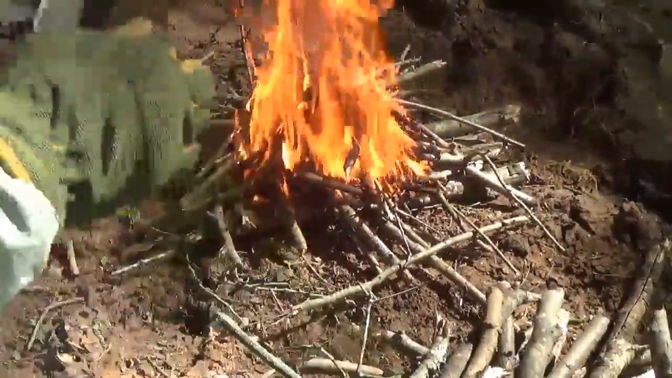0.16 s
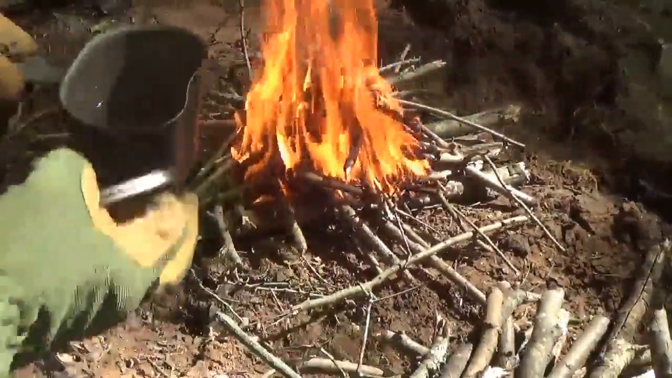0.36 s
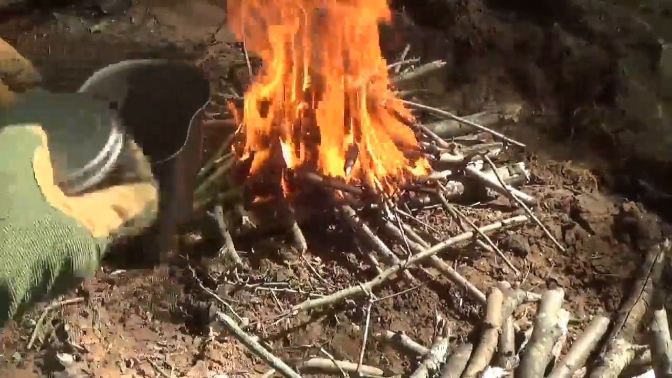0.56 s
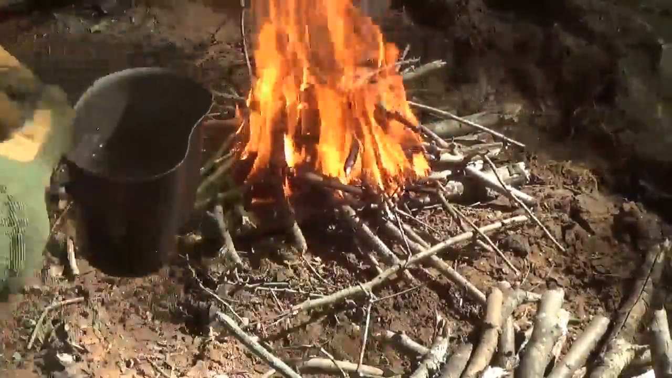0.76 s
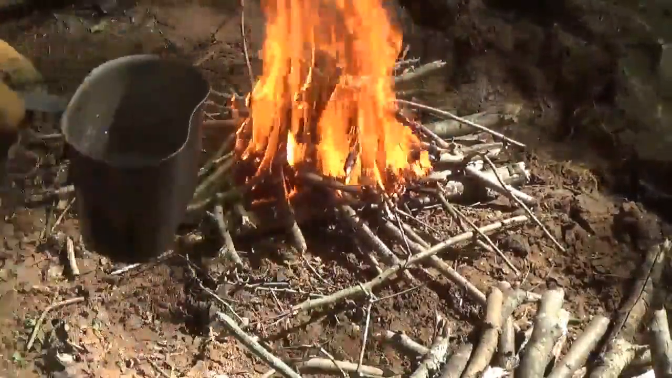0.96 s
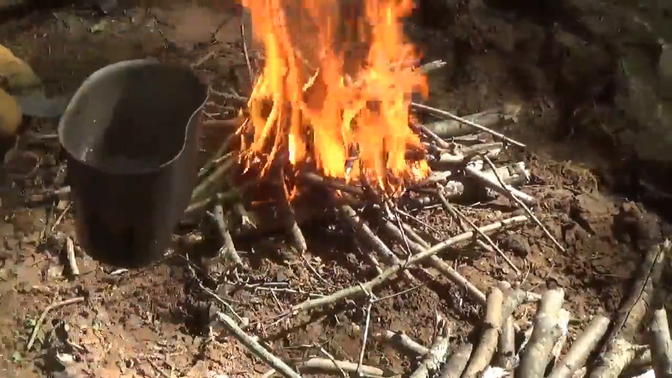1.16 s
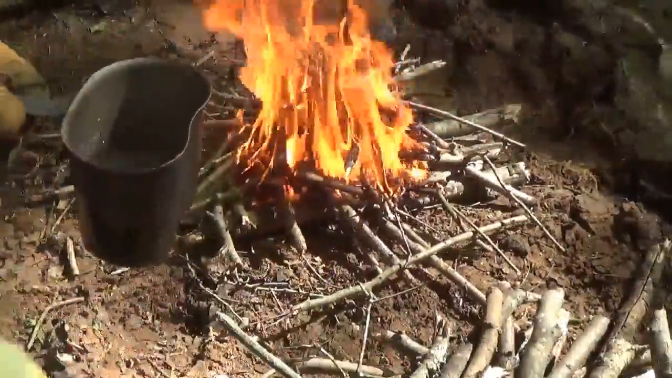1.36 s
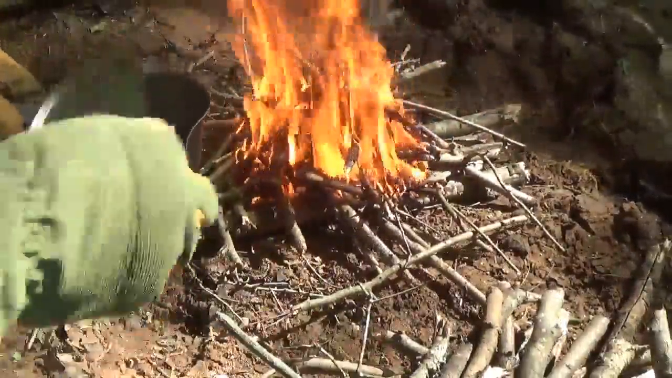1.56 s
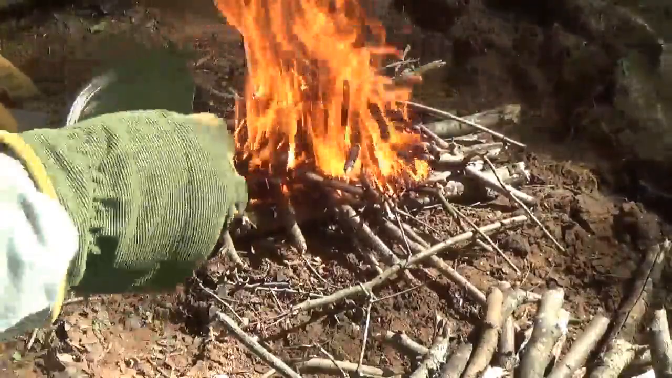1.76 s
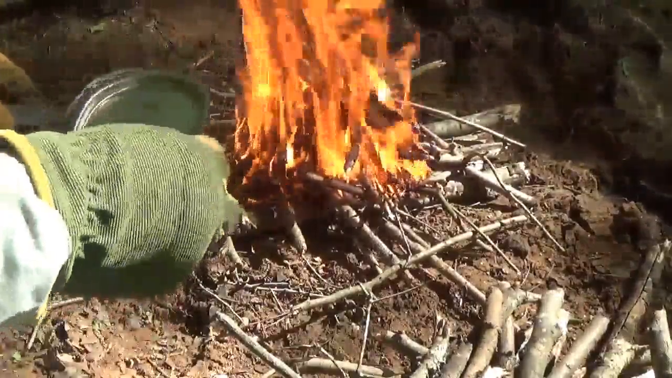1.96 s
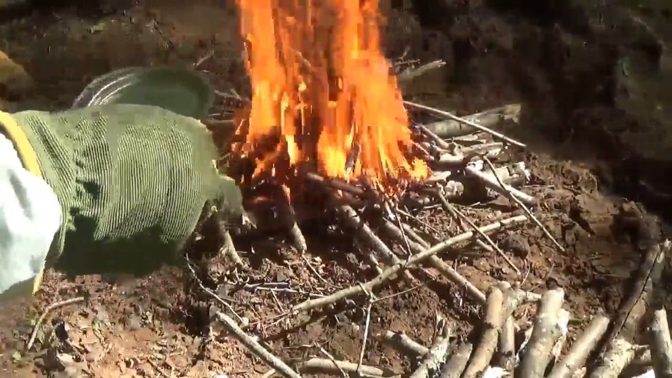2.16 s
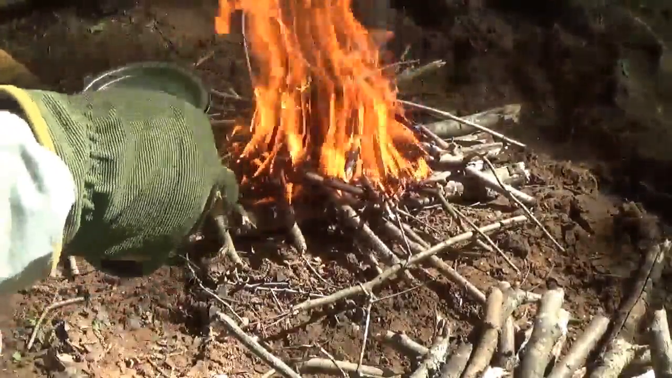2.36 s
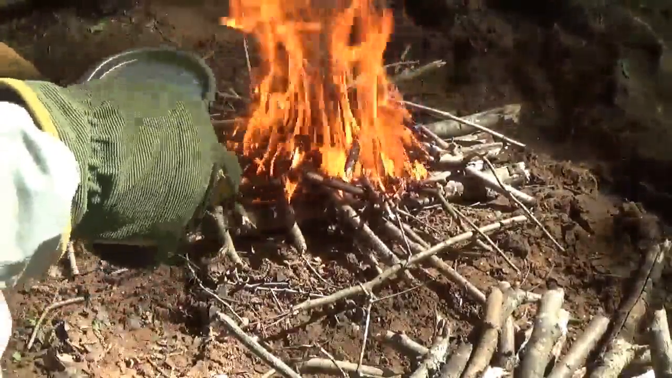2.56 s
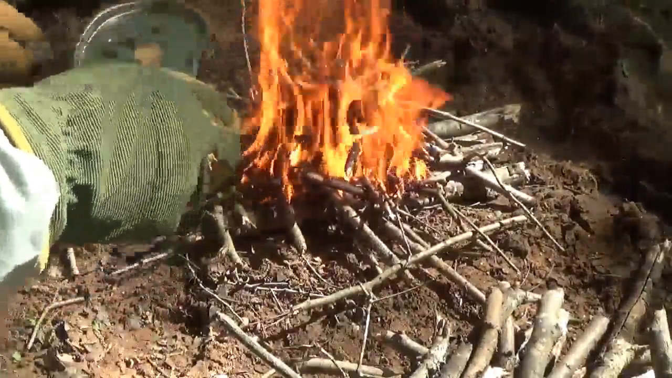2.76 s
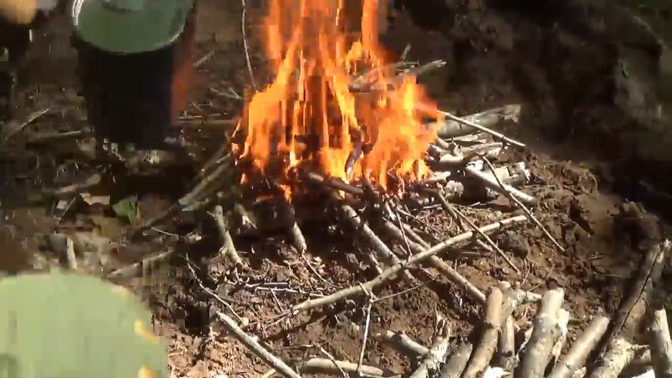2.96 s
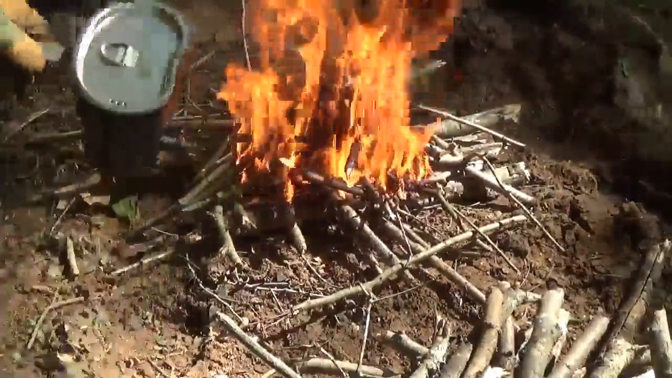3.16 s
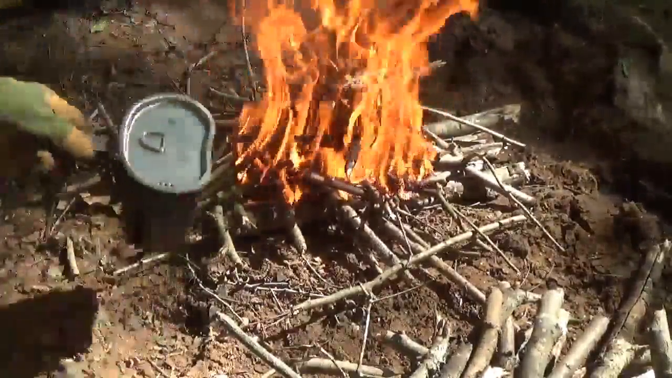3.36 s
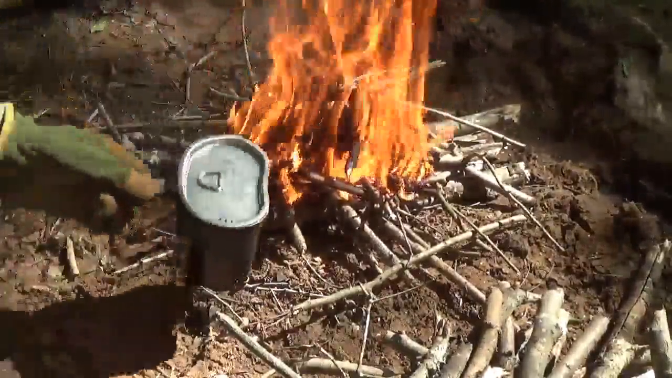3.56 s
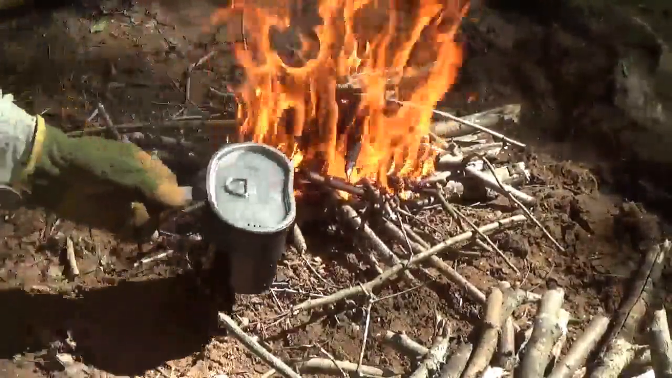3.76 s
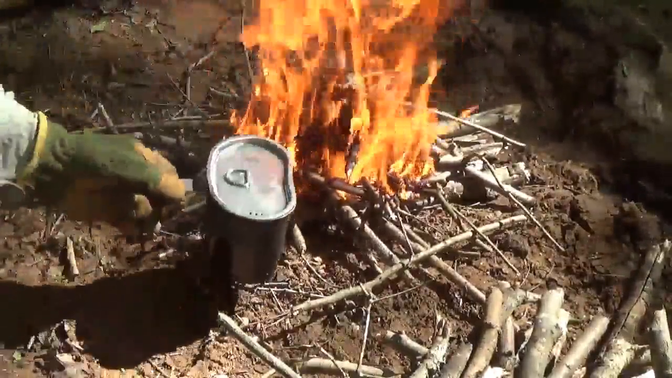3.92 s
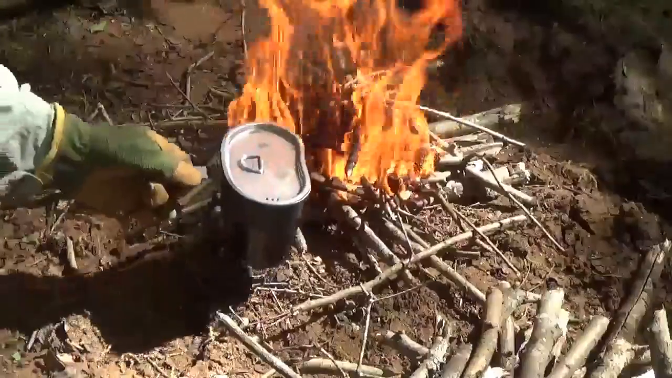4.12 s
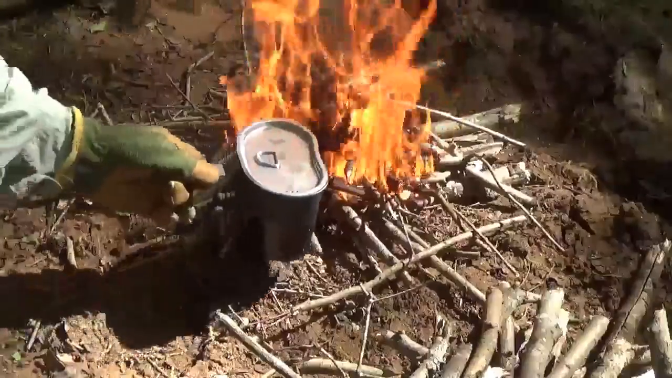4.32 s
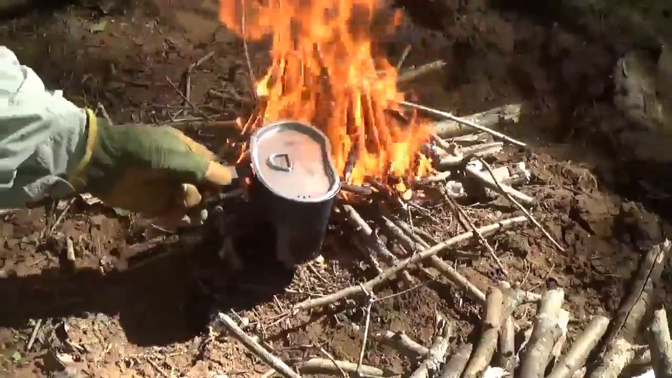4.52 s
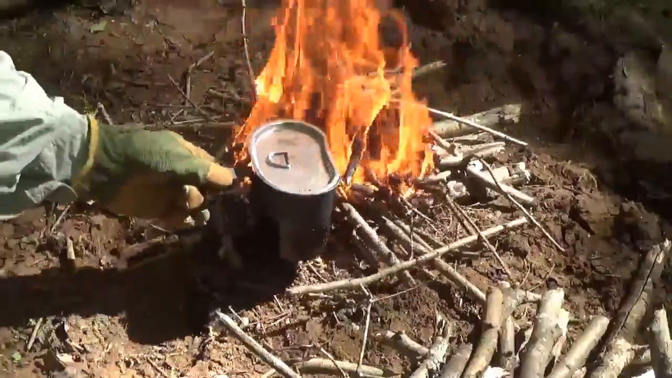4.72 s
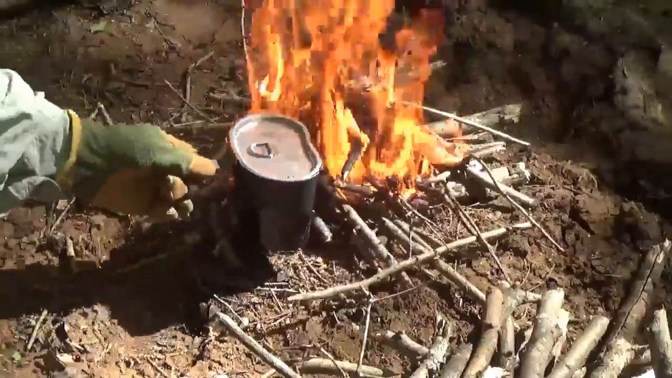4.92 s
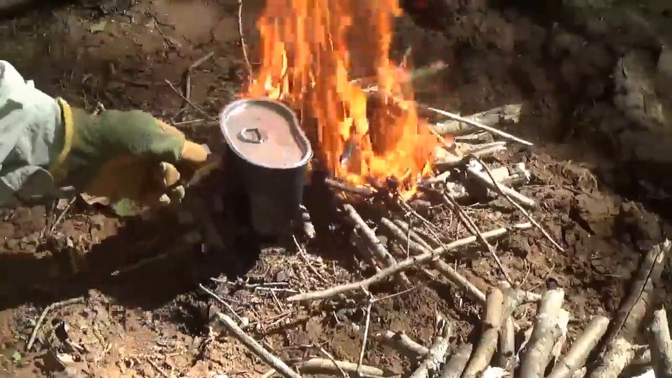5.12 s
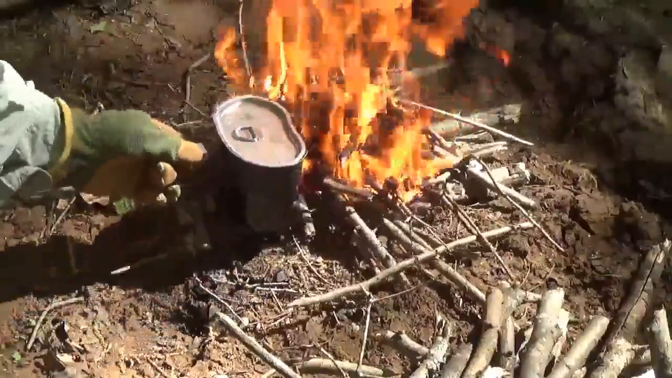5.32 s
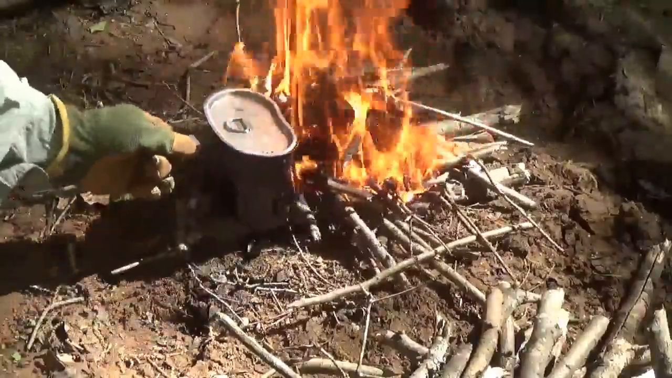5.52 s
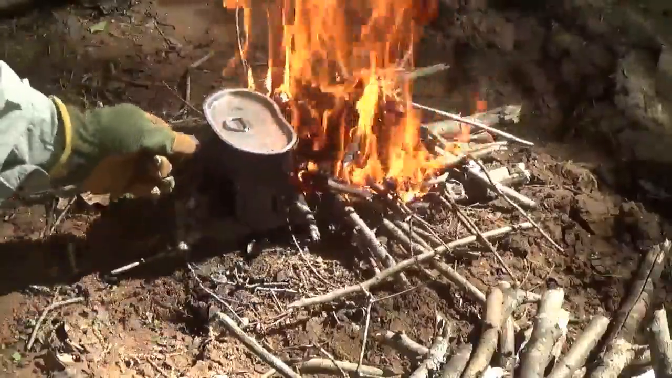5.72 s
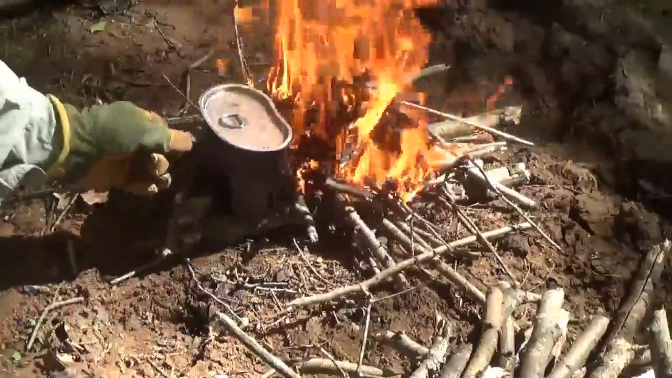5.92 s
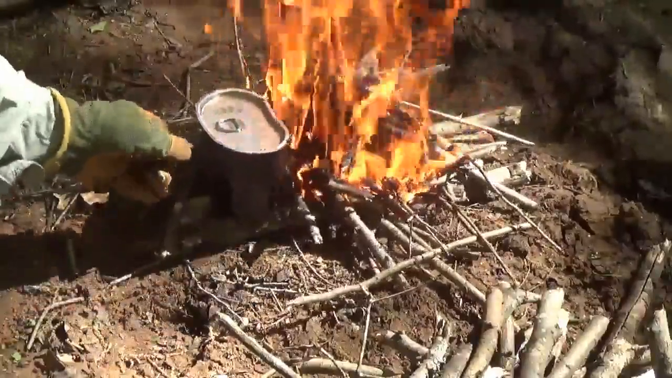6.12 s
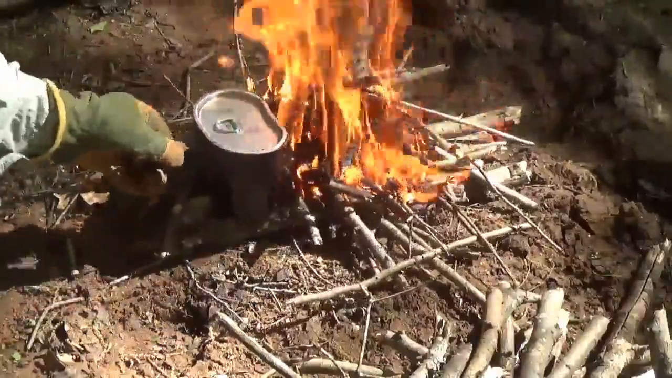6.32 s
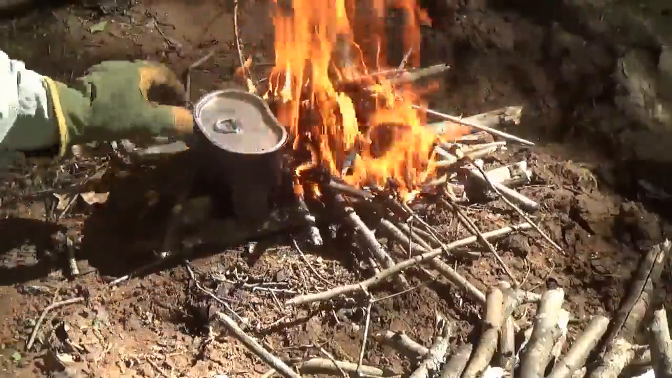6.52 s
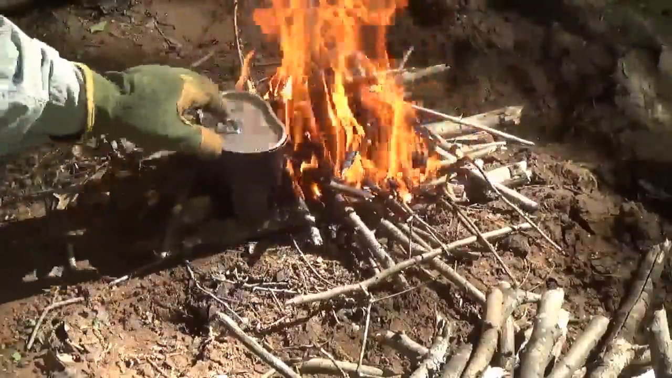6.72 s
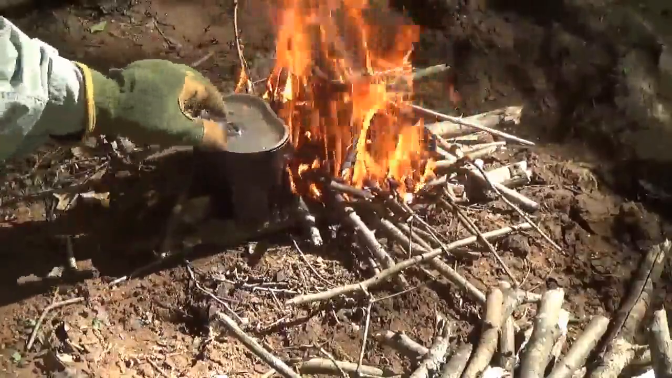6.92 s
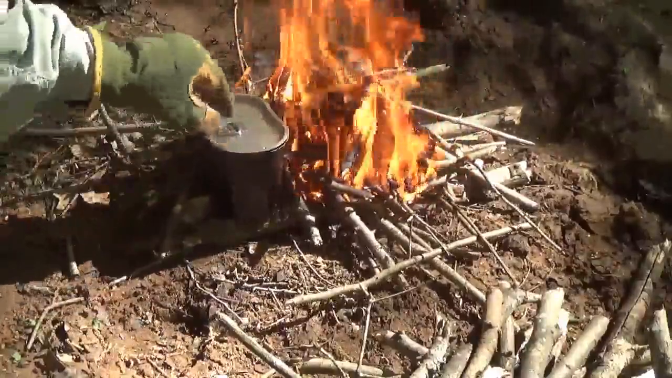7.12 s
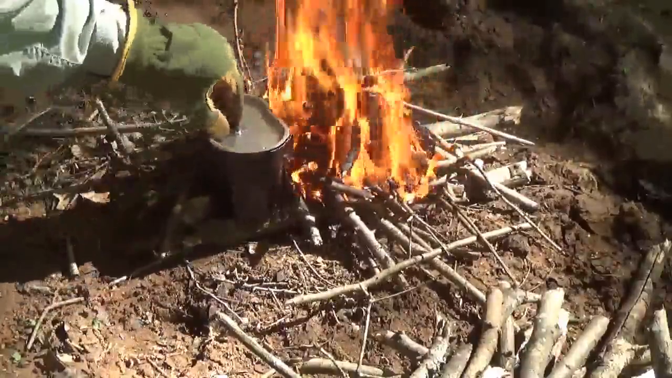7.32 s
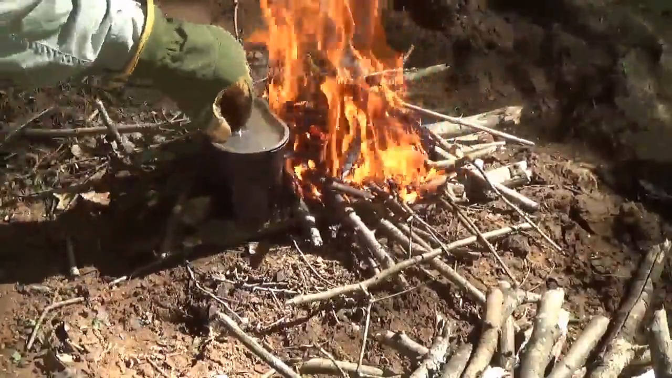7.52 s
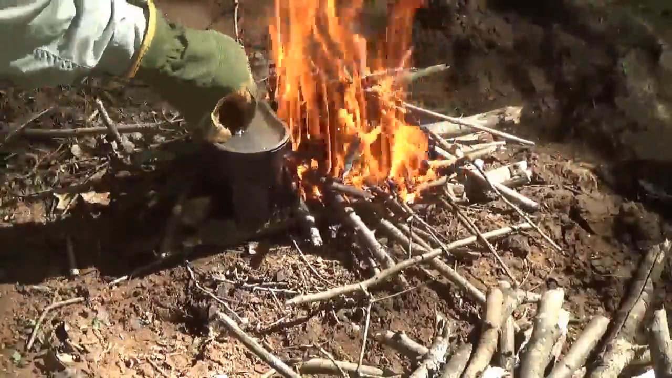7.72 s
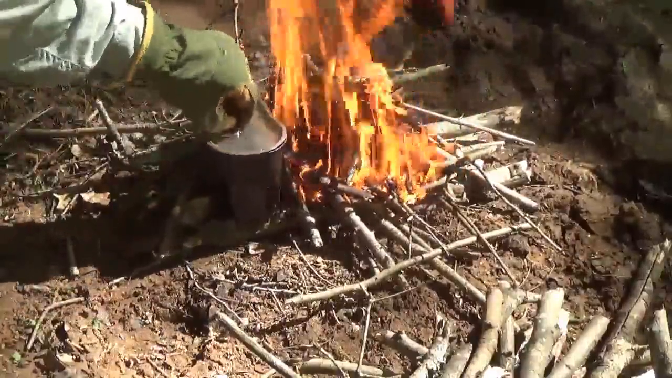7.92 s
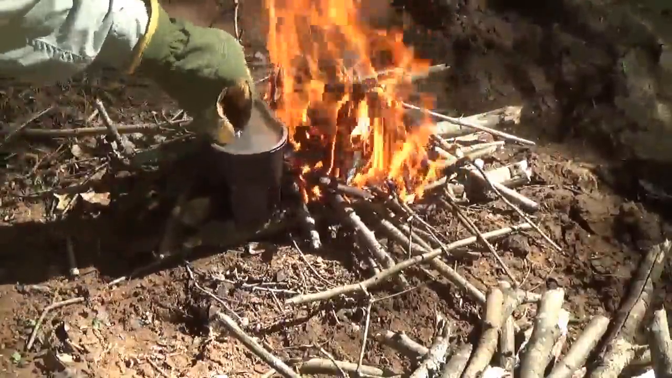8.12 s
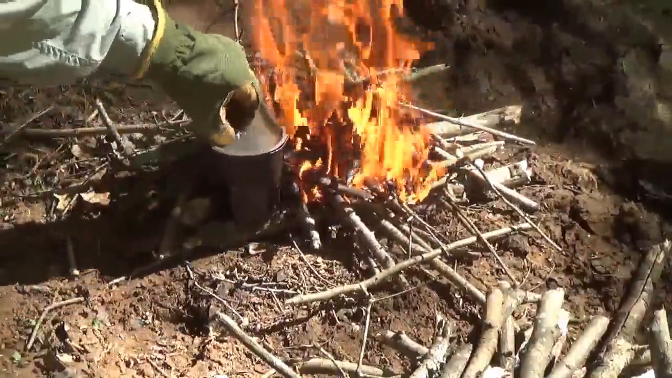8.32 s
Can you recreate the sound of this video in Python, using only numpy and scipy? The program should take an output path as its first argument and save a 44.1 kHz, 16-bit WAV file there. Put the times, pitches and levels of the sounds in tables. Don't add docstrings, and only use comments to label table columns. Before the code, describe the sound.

A soft, steady flame roar and thin windy leaf hiss run throughout, with irregular sap pops and twig snaps, in open woodland heard from close by in stereo. At about 0.7 s a steel cup lands with a quick double knock, then rocks faintly at 1.1 s amid light sizzling. A loose lid touches at 1.85 s, clanks brightly at 1.96 s and shifts at 2.1 s. From 2.25 to 2.6 s it grinds and knocks in rough pushes, the hollow boom lower and damped. Birds whistle short falling phrases from 1.9 to 4.1 s. Pops gather around 4 s; sizzling and dragging over sticks peak around 5.2 s, with tiny pings. At 6.7 s the lid ring scrapes and rattles for a tenth of a second. The wind swells at 7 s with a loud twig snap. High bird notes follow, a crisp tick at 7.8 s, and a faint hoarse call at the end.

```python
import sys
import numpy as np
from scipy import signal
from scipy.io import wavfile

SR = 44100
rng = np.random.default_rng(int(sys.argv[2]) if len(sys.argv) > 2 else 0)


def master_out(mix):
    frames = np.transpose(np.atleast_2d(mix))
    ceiling = np.clip(frames, -1, 1)
    pcm = np.round(ceiling * 32767).astype(np.int16)
    wavfile.write(sys.argv[1], SR, pcm)


def invert_db(level):
    return 10 ** (np.asarray(level, dtype=float) / 20)


N = 373968
t = np.arange(N) / SR


def rms_one(x):
    return x / np.sqrt(np.mean(x ** 2) + 1e-20)


def at_hz(points, hz):
    point_hz, point_db = np.transpose(points)
    return np.interp(np.log(hz), np.log(point_hz), point_db)


def band(x, low_hz, high_hz):
    sos = signal.butter(2, [low_hz, min(high_hz, .45 * SR)], "band", fs=SR, output="sos")
    return signal.sosfilt(sos, x + 1e-18)


def panned(x, pan_db):
    return x * invert_db(np.array([[.5], [-.5]]) * pan_db)


def drift(rate):
    r = np.exp(-80 * np.pi * rate / SR)
    slow = signal.lfilter([1], [1, -2 * r, r * r], rng.standard_normal(N // 40 + 2002))
    slow = slow[2000:]
    return np.interp(np.arange(N) / 40, np.arange(len(slow)), rms_one(slow))


def wander(size, spread_db):
    step = 1300
    knots = rng.standard_normal(size // step + 2)
    return invert_db(spread_db * np.interp(np.arange(size) / step, np.arange(len(knots)), knots))


def grains(per_s, spread_db):
    born = np.flatnonzero(rng.random(len(per_s)) < per_s / SR)
    size_db = spread_db * np.minimum(rng.exponential(1, len(born)), 5)
    out = np.zeros(len(per_s))
    out[born] = invert_db(size_db) * rng.choice([-1, 1], len(born))
    return rms_one(out)


def swells(time, rows):
    s, peak_db, rise_s, fall_s, part_db = np.transpose(rows)[..., None]
    u = time[::16]
    below_db = 20 * np.maximum((s - u) / rise_s, (u - s) / fall_s)
    gain = invert_db(np.maximum(peak_db - below_db, -200))
    part = gain * invert_db(part_db)
    return np.interp(time, u, gain.sum(axis=0)), np.interp(time, u, part.sum(axis=0))


def banded_noise(spectrum, octaves, patchy_db):
    # f/Hz, correlation [1]
    likeness = [(60, 1), (170, 0.96), (490, 0.98), (1420, 0.77), (4060, 0.5), (11600, 0.82)]
    first_hz, last_hz = spectrum[0][0], spectrum[-1][0]
    edges = first_hz * 2 ** np.arange(0, np.log2(last_hz / first_hz) + octaves, octaves)
    out, together, white = 0, drift(9.0), rng.standard_normal((2, 2, N))
    for k, (low, high) in enumerate(zip(edges, edges[1:])):
        mid, side = band(white[k % 2], low, high)
        hz = np.sqrt(low * high)
        alike = np.clip(at_hz(likeness, hz), -1, .98)
        flicker_db = patchy_db * (0.23 * together + drift(7.0))
        stereo = np.sqrt(1 + alike) * mid + np.sqrt(1 - alike) * side * [[1], [-1]]
        out = out + invert_db(at_hz(spectrum, hz) + flicker_db) * stereo
    return rms_one(out)


def air():
    # t/s, level/dB
    wind = [(0, 2.5), (1.8, -2.5), (2.7, 1.5), (3.2, 1.1), (6.65, -.6), (6.95, 5), (7.55, -1.1),
            (8.48, -2.1)]
    # f/Hz, level/dB
    roar_spectrum = [(30, -22), (60, -17), (125, -7.5), (200, -9.5), (320, -3.5), (450, -0.5), (800, -2.5),
                     (1600, -6.5), (3000, -14), (4500, -21)]
    # f/Hz, level/dB
    hiss_spectrum = [(2500, -5), (3500, -1), (5000, -1.5), (5800, -2.5), (6400, -10.5), (7200, -1.5),
                     (8500, -2), (10000, -11.5), (11500, 9)]
    gust_db = np.interp(t, *np.transpose(wind))
    roar = invert_db(-45 + .25 * gust_db) * banded_noise(roar_spectrum, .5, patchy_db=1.54)
    hiss = invert_db(-53.3 + gust_db) * banded_noise(hiss_spectrum, .25, patchy_db=3.4)
    return roar + hiss


def whistle(note, start_s, level_db):
    s, hz, note_db = np.transpose(note)
    u = np.arange(int(s[-1] * SR)) / SR
    phase = 2 * np.pi * np.cumsum(np.interp(u, s, hz)) / SR
    tone = invert_db(level_db + np.interp(u, s, note_db)) * np.sqrt(2) * np.sin(phase)
    return np.pad(tone, (round(start_s * SR), N))[:N]


def birds():
    # t into note/s, f/Hz, level/dB
    chip, short, slide = [(0, 5400, -18), (.01, 4400, -13), (.02, 3750, -7), (.03, 3460, 0),
                          (.05, 3440, -5), (.075, 3440, -14), (.16, 3440, -24)], [(0, 2643, -16), (.02, 2400, 5), (.05, 2240, 5), (.07, 2150, -4)], [(0, 2612, -17), (.02, 2374, -4), (.08, 2090, -10),
                                                       (.15, 1880, -9), (.22, 1720, -18), (.27, 1640, -17)]
    scoop, rise, flick = [(0, 8280, 1), (.04, 7200, 7), (.08, 6600, 4), (.14, 6950, -11)], [(0, 7130, 1), (.03, 7600, -6), (.06, 7900, -11), (.13, 7800, -12)], [(0, 6250, -6), (.008, 7060, 9), (.02, 7500, 2.5),
                                                       (.05, 7500, -19)]
    trill, warble = [(0, 2780, -5), (.02, 3350, -3), (.04, 2680, -7), (.055, 2800, -6), (.072, 2620, -12)], [(0, 3000, -9), (.05, 3000, -20), (.07, 3400, -4), (.09, 3300, -11),
                                    (.11, 2950, -8), (.13, 3600, -3), (.14, 4100, -4), (.15, 3200, -5),
                                    (.19, 2850, -10)]
    # start t/s, level/dB
    phrases = [(1.93, -44.5), (2.575, -42.5), (3.192, -40), (3.815, -41.5)]
    # t/s, pitch f/Hz, level/dB
    far_call = [(8.37, 455, -74), (8.39, 464, -50), (8.43, 442, -51.5), (8.46, 442, -52), (8.48, 447, -60)]
    # (start t/s, level/dB)
    songs = [(chip, -1, [(2.575, -49), *phrases[2:]]),
             (short, -1, [(s + .118, db - 12) for s, db in phrases]),
             (slide, -0.78, [(s + .243, db) for s, db in phrases]),
             (scoop, -9.5, [(6.2, -58), (6.56, -55.5), (6.94, -57), (7.32, -59)]),
             (rise, -3, [(6.35, -53), (6.98, -49), (7.09, -60)]),
             (flick, -10.5, [(.03, -53), (7.97, -50)]),
             (trill, 4.6, [(5.23, -51.5)]),
             (warble, 3.4, [(7.375, -53.5)])]
    direct, sent = 0, 0
    for note, direct_db, calls in songs:
        sung = sum(whistle(note, s, db) for s, db in calls)
        direct = direct + invert_db(direct_db) * sung
        sent = sent + sung
    s, hz, call_db = np.transpose(far_call)
    phase = 2 * np.pi * np.cumsum(np.interp(t, s, hz)) / SR
    stack = np.sin(phase) + 0.76 * np.sin(2 * phase) + 0.21 * np.sin(3 * phase) + 0.17 * np.sin(4 * phase)
    call = (t > s[0]) * invert_db(np.interp(t, s, call_db + 4)) * stack
    return direct * invert_db(3.5 * drift(105)) + call, sent


def wood(x):
    t60_s, first_echo_s = .65, .008
    u = np.arange(SR // 2) / SR
    tail = rng.standard_normal((2, len(u))) * invert_db(-60 * u / t60_s) * (u > first_echo_s)
    return signal.fftconvolve(x[None], rms_one(tail) / np.sqrt(len(u)), axes=1)[:, :N]


def snaps():
    # t/s, peak level/dB, low crack level/dB, middle crack level/dB
    twig_breaks = [(0.2793, -31, -9, 0), (0.2932, -21, -12, -13), (0.3686, -40, 2, -11),
                   (0.4024, -31, 0, -7), (0.8962, -18.5, -18, -13), (0.9954, -44, 16, -10),
                   (1.0437, -26, -6, -19), (1.2396, -30, -10, -7), (1.3877, -28, -4, 3),
                   (3.3452, -28.5, -5, -18), (3.4302, -26.5, -9, -11), (3.447, -34, -3, -8),
                   (3.7806, -17, -11, -6.5), (5.1078, -31, -16, -8), (5.8675, -22, -16, -9),
                   (5.97, -31, -10, -9), (7.0784, -10, -10.5, -12), (7.3137, -20, -20, 4.5),
                   (7.3312, -36, 2, 8.5), (7.3584, -45, -5, 16.5), (7.3781, -38, -4, 0)]
    # t/s, peak level/dB
    sap_pops = [(0.2013, -29.5), (0.478, -25.5), (3.2877, -26.5), (3.8454, -31), (3.929, -16.5),
                (4.0328, -22), (4.1355, -28), (4.1514, -31), (4.185, -24.5), (4.2467, -35), (4.3261, -33),
                (4.351, -28), (4.356, -30), (4.367, -30), (4.6533, -28), (4.8554, -27), (5.0145, -19.5),
                (5.2963, -31), (5.6505, -17), (5.772, -21), (6.0475, -32), (6.086, -24.5), (7.4677, -32),
                (7.723, -33.5), (7.9494, -21), (8.0147, -26), (8.0436, -31), (3.3954, -35), (3.8154, -35),
                (3.875, -36), (4.7698, -35), (5.0545, -30), (5.1637, -24), (5.195, -32), (5.595, -34),
                (5.6691, -32), (5.938, -32), (6.38, -34), (6.94, -33)]
    rows = list(twig_breaks)
    for s, db in sap_pops:
        body_db = -32.5 - .55 * db
        rows.append((s, db, body_db, body_db))
    out, size = np.zeros((2, N)), 600
    fade = np.exp(-np.arange(size) / SR / .001)
    for (s, peak_db, low_db, middle_db), noise in zip(rows, rng.standard_normal((len(rows), size))):
        burst = .2 * noise * fade
        burst[0] += 1.9
        crack = band(band(burst, 10080, 14000), 7700, 13000)
        crack += invert_db(middle_db - 1.0) * band(burst, 3160, 6100)
        crack += invert_db(low_db + 0.5) * band(burst, 1130, 4600)
        i = round(s * SR)
        pan_db = 1.1 + 3.5 * noise[-1]
        out[:, i:i + size] += panned(invert_db(peak_db + 12) * crack, pan_db)
    faint = grains(np.full(N, 40), spread_db=4)
    return out + invert_db(-61) * band(faint, 8500, 13000)


def ring(clicks, hz, t60):
    r, w = invert_db(-60 / (t60 * SR)), 2 * np.pi * hz / SR
    return signal.lfilter([0, np.sin(w)], [1, -2 * r * np.cos(w), r * r], clicks + 1e-18)


def boom(clicks, time, t60):
    # t/s, f/Hz
    hollow_pitch = [(.7, 940), (1.85, 1010), (1.94, 970), (1.98, 713), (2.07, 788), (2.13, 682), (2.3, 640),
                    (2.6, 676.6), (6.73, 451), (6.8, 495), (6.82, 634), (7.8, 580)]
    hz = np.interp(time, *np.transpose(hollow_pitch))
    turn = np.exp(2j * np.pi * np.cumsum(hz) / SR)
    decay = invert_db(-60 / (t60 * SR))
    return np.imag(turn * signal.lfilter([1], [1, -decay], clicks / turn + 1e-18))


def crowd(clicks, t60):
    u = np.arange(SR // 10) / SR
    shapes = rng.standard_normal((3, len(u))) * invert_db(-60 * u / t60)
    shapes /= np.linalg.norm(shapes)
    size = len(clicks)
    return sum(signal.oaconvolve(clicks * wander(size, 5), shape)[:size] for shape in shapes)


def steel(modes, blows, grind=None, edge=None, blur_db=-3, low_hz=700):
    colour_hz = [1500, 4000, 9000]
    blows = np.array(blows)
    at = np.round(blows[:, 0] * SR).astype(int)
    luck_db = rng.normal(0, 1.8, (len(blows), len(modes)))
    heard = slice(at[0] - 500, at[-1] + SR // 3)
    time, at = t[heard], at - heard.start
    rub = np.zeros((4, len(time)))
    if grind is not None:
        push, hollow = swells(time, grind)
        rasp = grains(5000 * wander(len(time), 2), spread_db=2.4)
        bright, middle = swells(time, edge)
        rub = np.array([hollow, push, middle, bright]) * invert_db([[0.5], [-4], [-12], [-10.5]]) * rasp

    ticks = np.zeros(len(time))
    ticks[at] = invert_db(blows[:, 4])
    rasping = invert_db(5) * band(rub[1], low_hz, 3560)
    rasping -= invert_db(1.5) * band(rub[2], 3000, 6900)
    rasping += invert_db(4.0) * band(rub[3], 6900, 16000)
    blur = crowd(rasping + invert_db(12.5) * band(ticks, 1360, 9100), t60=0.06)
    out = invert_db(-6.5) * rasping + invert_db(blur_db) * blur
    out += invert_db(-4) * band(ticks, 800, 12000)

    for k, (hz, mode_db, t60) in enumerate(modes):
        colour_db = [np.interp(np.log(hz), np.log(colour_hz), blow[2:]) for blow in blows]
        rubbed = rub[1 + int(hz > 3000) + int(hz > 7000)]
        clicks = invert_db(-31) * rubbed * wander(len(time), 4)
        clicks[at] += invert_db(colour_db + luck_db[:, k] - 8)
        out += invert_db(mode_db) * ring(clicks, hz, np.clip(t60, .02, .45))

    puffs = invert_db(-36) * rub[0]
    puffs[at] += invert_db(blows[:, 1])
    out += boom(puffs, time, t60=0.1)
    no_bass = signal.butter(4, 380, "high", fs=SR, output="sos")
    whole = np.zeros(N)
    whole[heard] = signal.sosfilt(no_bass, out)
    return whole


def set_down_cup():
    # f/Hz, level/dB, t60/s
    cup_modes = [(897, -24, 0.071), (1750, -4, 0.097), (2374, -10.5, 0.096), (2756, 0, 0.045),
                 (3920, -11.5, 0.04), (4037, -10.5, 0.056), (4800, -26, 0.043), (6379, -31, 0.092),
                 (8460, -21, 0.072), (9030, -15, .1), (10280, -8, 0.05), (10920, -10, 0.072)]
    # t/s, boom level/dB, strength/dB near 1500, 4000 and 9000 Hz
    cup_blows = [
        (0.732, -40.5, -16.5, -9, -9.5),
        (0.743, -31, -11, -4.5, -11),
        (1.055, -36, -12, -51, -33),
        (1.101, -48, -37, -26, -24),
        (1.388, -49.5, -29, -34.5, -24.5),
    ]
    return steel(cup_modes, cup_blows, blur_db=-7)


def pings():
    # t/s, f/Hz, level/dB, t60/s
    touches = [(.897, 7600, -44, .12), (4.01, 10100, -42, .06), (4.351, 9300, -36, .1),
               (5.21, 1750, -38, .06), (5.425, 2300, -42, .04), (5.515, 1750, -40, .06),
               (5.5344, 4440, -40, .06), (5.8038, 3730, -42, .15)]
    out, u = np.zeros(N + SR), np.arange(SR // 4) / SR
    for s, hz, level_db, t60 in touches:
        out[round(s * SR):][:len(u)] += invert_db(level_db - 60 * u / t60) * np.sin(2 * np.pi * hz * u)
    return out[:N]


def sizzle():
    # peak t/s, peak level/dB, 20 dB rise/s, 20 dB fall/s, dull share level/dB
    sizzle_swells = [(1.07, -51, .09, .17, 5), (1.225, -52.5, .02, .36, -1), (2.882, -53, .2, .13, 3),
                     (3.834, -53.5, .06, .55, 5), (5.12, -47, .2, .1, -4), (5.165, -41, .03, .05, -3),
                     (5.2, -42, .04, .05, -2), (5.335, -47, .04, .15, -4), (5.41, -49, .1, .05, 0),
                     (5.555, -51, .03, .1, -2), (5.81, -49, .02, .06, -1), (4.355, -48, .01, .06, -4),
                     (5.898, -51, .9, .4, -4), (7.82, -34, .016, .048, -10), (7.978, -57, .03, .3, -6)]
    bright, dull = swells(t, sizzle_swells)
    cracks = grains(2500 * invert_db(4 * drift(40)), spread_db=2.6)
    out = invert_db(8.0) * band(bright * cracks, 9300, 12800)
    out -= invert_db(-1.5) * band(bright * cracks, 6300, 9300)
    return out + invert_db(8) * band(dull * cracks, 1300, 6000)


def fit_lid():
    # f/Hz, level/dB, t60/s
    lid_modes = [(991, -10, .2), (1034, -14, .3), (1109, -3, .13), (1206, -13, .25), (1290, -14, .2),
                 (1416, -11, .22), (1606, -7, .07), (1755, -7, .08), (1930, -12, .12), (2345, -10, .08),
                 (2767, -9, .08), (2902, -10, .13), (3225, -15, .15), (3730, -17, .12), (4064, -12, .12),
                 (4240, -1, .11), (4620, -19, .08), (4970, -20, .15), (5905, -20, .25), (6910, -24, .2),
                 (7634, -32, .2), (8600, -13, .08), (9470, -21, .13), (10245, -16, .08), (10960, -17, .06)]
    # t/s, boom level/dB, strength/dB near 1500, 4000 and 9000 Hz
    lid_blows = [
        (1.848, -25.5, -26.5, -21, -18.5),
        (1.9082, -34, -36, -32, -34),
        (1.959, -29, -5, -12, -3),
        (2.128, -27.5, -30, -13, -20.5),
    ]
    # peak t/s, peak level/dB, 20 dB rise/s, 20 dB fall/s, hollow part level/dB
    lid_grind = [(1.852, -33, .004, .4, 0), (1.962, -19, .005, .11, -1), (2.11, -42, .2, .03, 18),
                 (2.136, -21, .016, .04, 0), (1.925, -37, .06, .1, 6)]
    # peak t/s, peak level/dB, 20 dB rise/s, 20 dB fall/s, middle part level/dB
    lid_rasp = [(1.852, -39, .004, .3, 8), (1.92, -41, .05, .1, 9), (1.962, -24, .004, .05, 6),
                (2.01, -39, .03, .3, 7), (2.132, -33, .01, .06, 10.5)]
    return steel(lid_modes, lid_blows, lid_grind, lid_rasp, blur_db=-8.5)


def seat_lid():
    # f/Hz, level/dB, t60/s
    seated_modes = [(990, -10, .08), (1114, -8, .06), (1460, -4, .06), (1590, -10, .07), (1754, 0, .07),
                    (2060, -11, .06), (2305, -13, .08), (2575, -10, .06), (2767, -12, .1), (3170, -14, .1),
                    (3270, -12, .1), (3410, -19, .3), (3895, -13, .1), (4190, -12, .08), (4264, -10, .1),
                    (4667, -13, .1), (5087, -11, .08), (5410, -14, .1), (5620, -15, .1), (5890, -13, .09),
                    (6510, -17, .06), (7600, -19, .12), (8010, -18, .15), (8340, -16, .1), (8550, -16, .15),
                    (8900, -16, .1), (9210, -15, .08), (9980, -13, .07), (10280, -15, .09),
                    (10980, -15, .09)]
    # t/s, boom level/dB, strength/dB near 1500, 4000 and 9000 Hz
    seated_blows = [(2.2393, -33, -27, -42, -45), (2.2657, -35, -22, -35, -32),
                    (2.2797, -36, -20, -32, -30), (2.3062, -21, -14, -16, -16), (2.316, -28, -18, -18, -22),
                    (2.366, -36, -23, -28, -38), (2.4194, -34, -26, -32, -34),
                    (2.4428, -25.5, -8, -18, -16), (2.5197, -45, -24, -34, -28),
                    (2.5292, -45, -20, -32, -28), (2.5576, -40, -20, -26, -22),
                    (2.5666, -25, -13, -19, -28)]
    # peak t/s, peak level/dB, 20 dB rise/s, 20 dB fall/s, hollow part level/dB
    seated_grind = [(2.27, -30, .015, .1, 3), (2.295, -27, .03, .03, 5), (2.311, -18, .012, .06, 0),
                    (2.33, -23, .03, .03, 5), (2.365, -29, .03, .09, 2), (2.42, -28, .08, .03, 4),
                    (2.446, -13, .006, .055, 3), (2.545, -23, .11, .06, -10), (2.568, -17, .008, .045, 6)]
    # peak t/s, peak level/dB, 20 dB rise/s, 20 dB fall/s, middle part level/dB
    seated_rasp = [(2.285, -27, .04, .06, -1), (2.309, -17, .008, .05, 3), (2.33, -24, .03, .025, 6),
                   (2.365, -39, .02, .04, 11), (2.425, -32, .05, .03, 6), (2.443, -19, .004, .06, 4),
                   (2.53, -25, .025, .1, -4), (2.555, -23, .03, .05, -3), (2.568, -30, .004, .05, 9)]
    return steel(seated_modes, seated_blows, seated_grind, seated_rasp)


def flip_ring():
    # f/Hz, level/dB, t60/s
    shut_modes = [(1430, -12, .12), (1575, -8, .08), (1710, -6, .07), (1885, -11, .06), (2090, -6, .07),
                  (2250, 0, .06), (2420, -7, .05), (2570, -8, .07), (2760, -13, .18), (3580, -21, .35),
                  (3935, -10, .06), (4030, -5, .06), (4105, -1, .08), (4285, -11, .06), (4640, -21, .35),
                  (5114, -11, .06), (5570, -14, .26), (5825, -19, .25), (6600, -15, .08), (7935, -18, .15),
                  (8890, -14, .06), (9400, -12, .1), (10960, -7, .13)]
    # t/s, boom level/dB, strength/dB near 1500, 4000 and 9000 Hz
    shut_blows = [(6.695, -43, -30, -32, -32), (6.7083, -45, -24, -24, -28), (6.7217, -36, -17, -26, -30),
                  (6.731, -36, -20, -12, -18), (6.7357, -36, -13, -17, -24), (6.751, -34, -13, -18, -18),
                  (6.785, -45, -21, -36, -23), (6.825, -33, -22.5, -37, -29),
                  (7.805, -29, -36.5, -47.5, -49.5), (7.819, -63, -38, -37, -18),
                  (8.026, -57.5, -33, -40.5, -44.5)]
    # peak t/s, peak level/dB, 20 dB rise/s, 20 dB fall/s, hollow part level/dB
    ring_grind = [(6.7, -30, .012, .1, -12), (6.722, -21, .04, .03, -18), (6.745, -14, .03, .022, -22),
                  (6.79, -26, .015, .03, -20), (6.83, -33, .02, .1, -10)]
    # peak t/s, peak level/dB, 20 dB rise/s, 20 dB fall/s, middle part level/dB
    ring_rasp = [(6.712, -25, .025, .06, 5), (6.738, -16, .015, .05, 5), (6.757, -16, .02, .02, 4),
                 (6.78, -31, .02, .12, 4)]
    return steel(shut_modes, shut_blows, ring_grind, ring_rasp, blur_db=-6, low_hz=1230)


def scene():
    song, sent = birds()
    fire = snaps()
    cup, lid, shut = set_down_cup(), fit_lid() + seat_lid(), flip_ring()
    near = fire + panned(cup, 3.8) + panned(lid, .9) + panned(shut + pings(), 1.0) + panned(sizzle(), -.3)
    echoes = wood(invert_db(-24) * (cup + lid + shut + fire.mean(axis=0)) + invert_db(-4.5) * sent)
    return near + panned(song, -7) + echoes + air()


def band_limit(x):
    return signal.sosfilt(signal.butter(12, 11500, fs=SR, output="sos"), x)


def record(dry):
    top_cut = signal.ellip(6, .3, 15, 10990, fs=SR, output="sos")
    mix = signal.sosfiltfilt(top_cut, dry)
    return band_limit(mix)


dry = scene()
out = record(dry)
master_out(out)
```